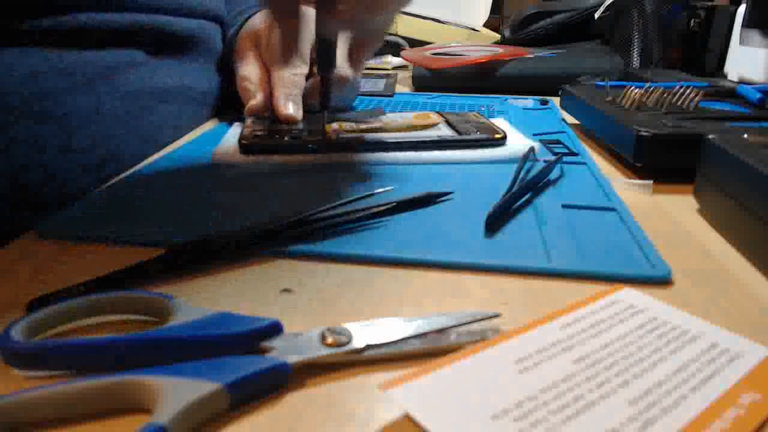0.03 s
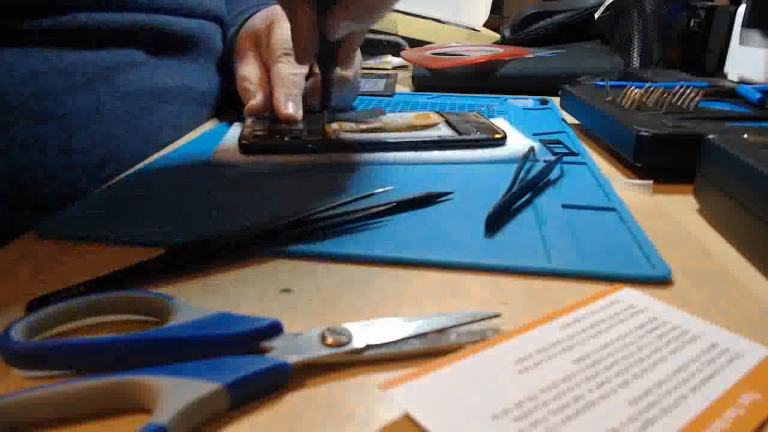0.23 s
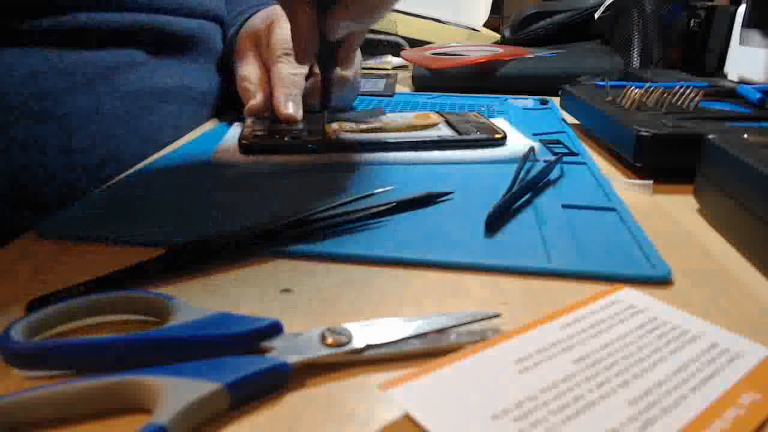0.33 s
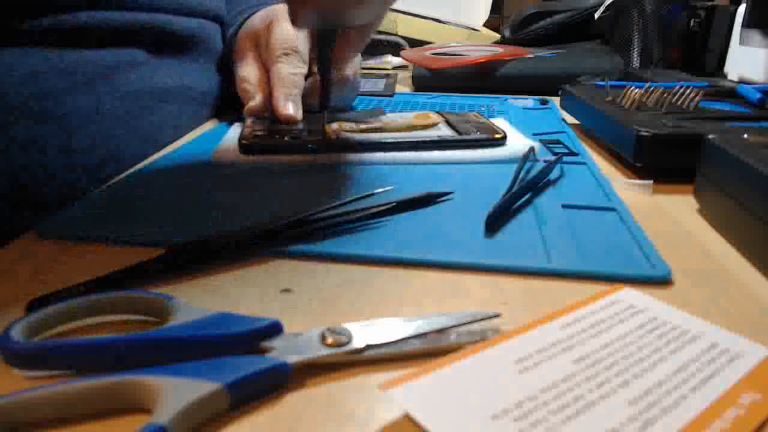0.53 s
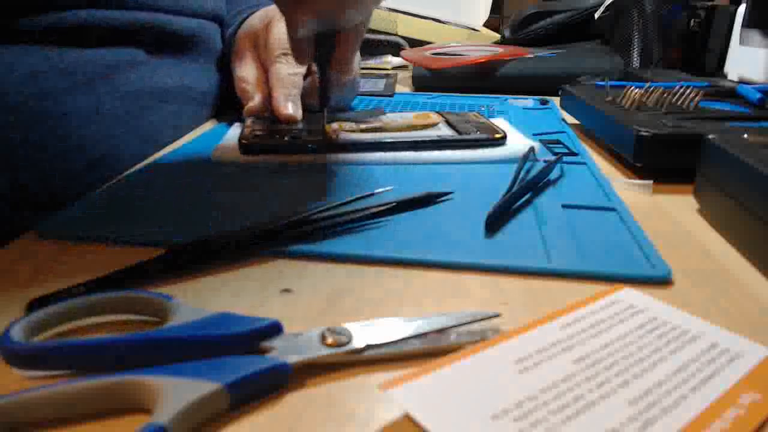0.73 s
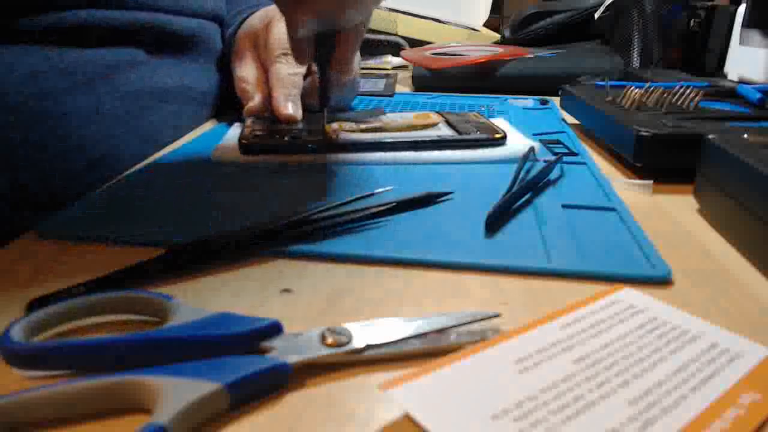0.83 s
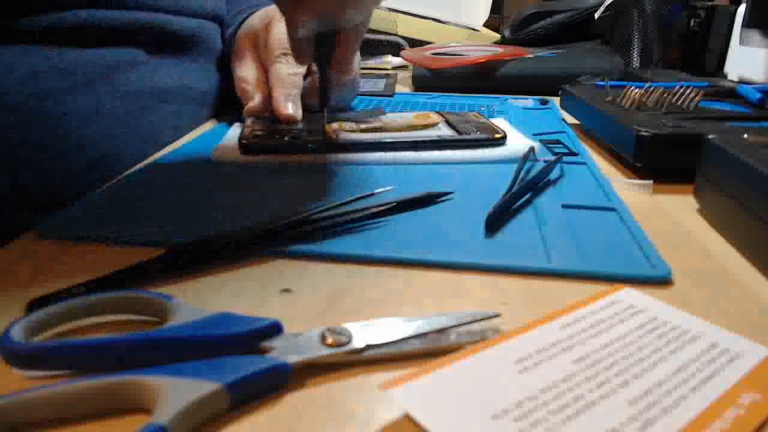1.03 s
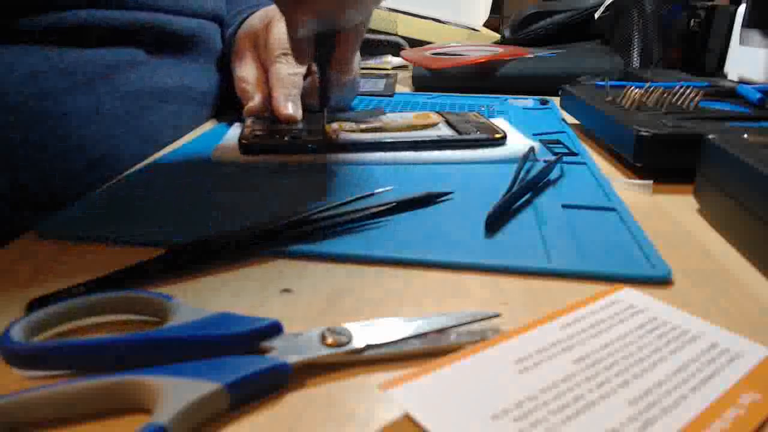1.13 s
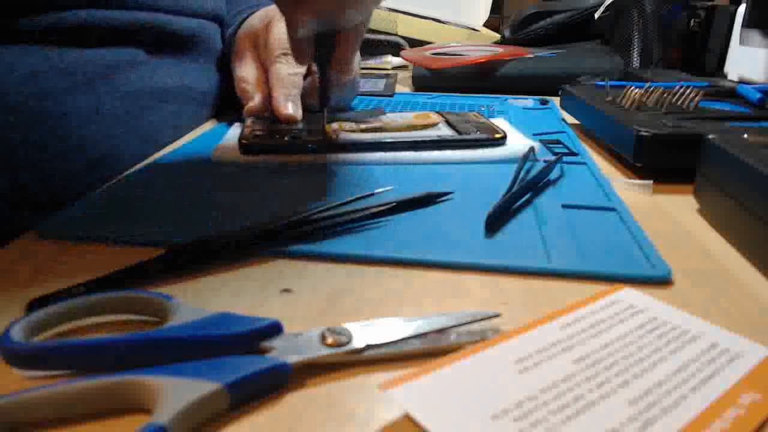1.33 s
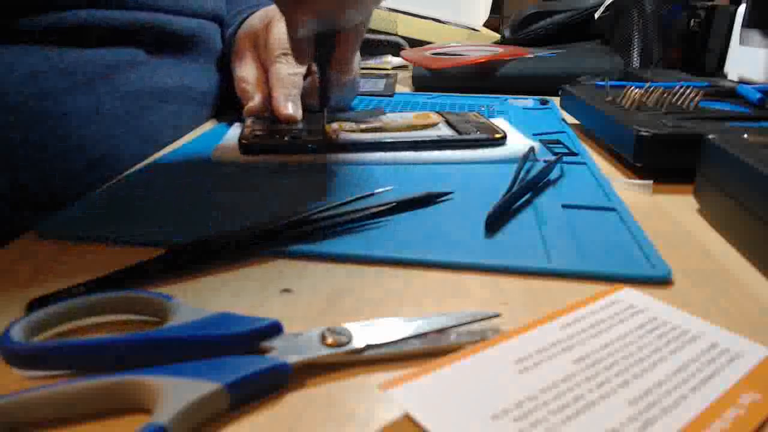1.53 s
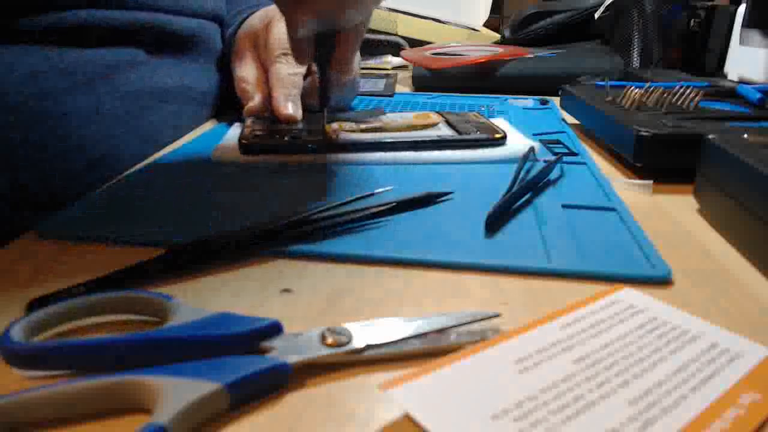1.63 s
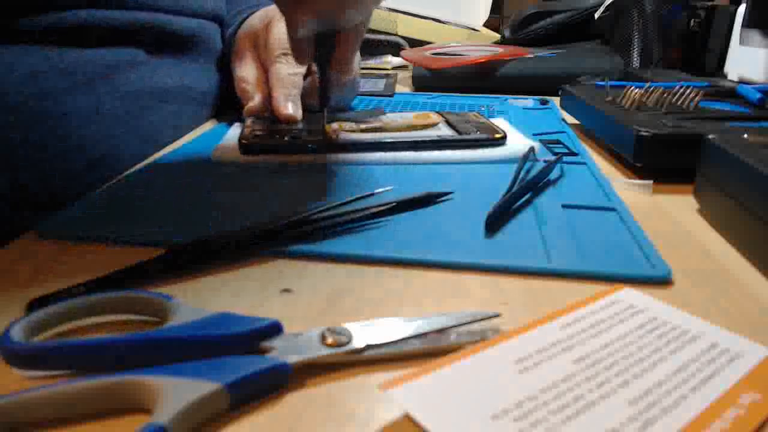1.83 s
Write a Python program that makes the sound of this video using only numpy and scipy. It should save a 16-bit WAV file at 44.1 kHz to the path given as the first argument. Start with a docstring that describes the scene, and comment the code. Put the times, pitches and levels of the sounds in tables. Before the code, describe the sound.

A small screwdriver ticks and knocks against a metal device frame on a desk mat. After a barely audible touch, a hard, woody-metallic clack lands at 0.25 s with a short scrape and small aftershocks. Faint ticks near 0.5, a click cluster at 0.65, a brighter ringing rattle at 0.82, then sparse light ticks at 1.1, 1.4 and 1.55. Close, small room, faint fan-like hum and hiss throughout.

```python
"""A small screwdriver works tiny screws in a metal frame on a work mat, close to a two-port microphone.
Steel ticks and knocks through frame and desk are sums of damped modes; hand pushes are single low swings.
Scrapes are dense filtered clicks. A small room answers the ticks, knocks and pushes by convolution.
Beneath lie mains harmonics, a fan-like drone of narrow noise bands, a thin whine and shaped hiss."""
import sys
import numpy as np
from scipy import signal
from scipy.fft import rfft, irfft
from scipy.io import wavfile
from scipy.ndimage import uniform_filter1d

SR = 44100
rng = np.random.default_rng(int(sys.argv[2]) if len(sys.argv) > 2 else 0)


def boost(x):
    """Linear amplitude factor 10**(x/20) for a level x in decibels (scalar or array-like)."""
    u = np.asarray(x, float) / 20
    return 10 ** u


def to_wav(sig):
    """Store sig (one row per channel, or 1-D mono) as 16-bit WAV at the path in sys.argv[1].

    Samples outside -1..1 are clipped; the rate is SR.
    """
    pcm = np.clip(np.atleast_2d(sig), -1, 1) * 32767
    pcm = np.round(pcm).astype(np.int16)
    wavfile.write(sys.argv[1], SR, pcm.T)  # frames by channels


N = 83790


def evened(x):
    """Normalization: scales a signal to rms 1."""
    return x / np.sqrt(np.mean(x ** 2) + 1e-20)


def read(points, hz):
    """Linear interpolation of a table on a logarithmic frequency axis."""
    f, value = np.transpose(points)
    return np.interp(np.log(hz + 1), np.log(f + 1), value)


def add(mix, s, sound):
    """Superposition: adds a sound to the mix from time s."""
    part = mix[..., round(s * SR):][..., :sound.shape[-1]]
    part += sound[..., :part.shape[-1]]


def sides(db):
    """Interaural-style level difference: left and right gains, db apart and centred on 0 dB."""
    return boost(np.array([[db / 2], [-db / 2]]))


def early(x, lead_s):
    """Arrival-time difference: a linear phase shift puts the left port ahead of the right."""
    hz = np.fft.rfftfreq(len(x), 1 / SR)
    advance = np.exp(2j * np.pi * hz * np.array([[lead_s], [0]]))
    return irfft(rfft(x) * advance, len(x))


def hum():
    """Harmonic series: steady sines of random phase at multiples of the mains frequency."""
    # Mains harmonics: multiple, rms level/dB midway between the ports
    harmonics = [(2, -75), (3, -65), (4, -68.5), (5, -88.5)]
    mains_hz = 49.07
    t = np.arange(N) / SR
    out = np.zeros(N)
    for k, db in harmonics:
        out += np.sqrt(2) * boost(db) * np.sin(2 * np.pi * (k * mains_hz * t + rng.random()))
    return out


def drone():
    """Narrow-band noise: low-passed complex noise modulates a carrier, so each band wavers."""
    # Fan-like bands: centre f/Hz, width of one filter stage/Hz, rms level/dB midway between the ports
    bands = [(44.5, 3.7, -70), (382, 14, -83), (420.4, 21, -66), (460, 19, -68), (538.3, 10, -73.5),
             (619.3, 19.6, -61), (654, 10.6, -63), (673, 3.5, -70), (713.5, 17, -64), (1121, 90, -75),
             (1534, 76, -85), (1665, 14, -84.5)]
    t = np.arange(N) / SR
    out = np.zeros(N)
    for hz, width, db in bands:
        pole = np.exp(-np.pi * width / SR)
        envelope = rng.standard_normal((N, 2)) @ [1, 1j]
        for _ in range(2):
            envelope = signal.lfilter([1 - pole], [1, -pole], envelope)
        out += boost(db) * evened((envelope * np.exp(2j * np.pi * hz * t)).real)
    return out


def whine():
    """Frequency modulation: a thin sine of steady level follows a slowly wandering pitch."""
    mean_hz, wander_rms_hz, rms_db = 3900, 22.5, -92.5
    hz = mean_hz + wander_rms_hz * evened(uniform_filter1d(rng.standard_normal(N), size=800))
    return np.sqrt(2) * boost(rms_db) * np.sin(2 * np.pi * np.cumsum(hz) / SR)


def hiss():
    """Partially coherent noise: random short-time spectra, mixed to a given likeness of the ports."""
    # Spectral shape of the hiss: f/Hz, relative density level/dB
    shape = [(15, -26), (25, -6), (157, -9.5), (324, -8.5), (422, -4), (537, -12), (621, -3), (810, -11),
             (1110, -16), (3540, -33), (3990, -33.5), (8040, -43.5), (10500, -78.5), (17700, -120)]
    # Coherence of the two ports: f/Hz, left-right likeness (0 to 1)
    likeness = [(60, 0.37), (200, 1), (670, 0.65), (2260, 0.13), (7590, 0.02)]
    rms_db, patch_rms_db, size = -58, 2.5, 2048
    frames, hz = N * 4 // size + 5, np.fft.rfftfreq(size, 1 / SR)
    a, b, c, d, patch = rng.standard_normal((frames, len(hz), 5)).T
    # Smoothing over frequency and time makes patches of raised and lowered level
    patch = uniform_filter1d(uniform_filter1d(patch, size=14, axis=0), size=8, axis=1)
    level_db = read(shape, hz)[:, None] + patch_rms_db * evened(patch)
    same = np.clip(read(likeness, hz), -1, 1)[:, None]
    left = a + 1j * b
    right = same * left + np.sqrt(1 - same ** 2) * (c + 1j * d)
    spectra = np.array([left, right]) * boost(level_db)
    sound = signal.istft(spectra, nperseg=size, noverlap=size * 3 // 4)[1][:, :N]
    return boost(rms_db) * evened(sound)


def background():
    """Superposition of the steady sounds, stronger at the left port."""
    return (hum() + drone() + whine() + hiss()) * sides(4.5)


def body_ports(x):
    """Port differences of knocks and pushes: the left is 4 dB stronger and 86 microseconds late."""
    return early(x, -0.000086) * sides(4)


def pushes():
    """Transient displacement: each hand push on the desk is a low swing that dies without ringing."""
    # Hand pushes: start t/s, approximate peak level/dB midway between the ports, swing period/s
    swings = [(.034, -44.5, 0.015), (.236, -31.5, 0.014), (.355, -54, 0.063), (.487, -41.5, 0.013),
              (0.627, -41, .016), (0.658, -42.5, 0.0089), (0.67, -41, 0.0062), (1.301, -56, 0.016),
              (1.415, -57, 0.022)]
    out = np.zeros(N)
    for s, db, period in swings:
        u = np.arange(0, 3 * period, 1 / SR) / period
        envelope = np.minimum(u / .2, 1) * np.exp(-(u / .9) ** 4)
        add(out, s, boost(db) * np.sin(2 * np.pi * u) * envelope)
    return body_ports(out)


def ring(modes, mid_hz, spread, chance, rise_s, spread_db=1.5, detune=.012):
    """Modal synthesis: damped sines, strongest near the pitch the blow favours, scaled to peak 1."""
    t = np.arange(round(.2 * SR)) / SR
    out = np.zeros(len(t))
    for (hz, db, t60), (a, b) in zip(modes, chance):
        favour_db = -4.34 * (np.log2(hz / mid_hz) / spread) ** 2
        decay = boost(db + favour_db + spread_db * a - 60 * t / t60)
        # All modes are in step two rise times after the start
        out += decay * np.sin(2 * np.pi * hz * (1 + detune * b) * (t - 2 * rise_s))
    out *= (1 - np.exp(-t / rise_s)) ** 2
    return out / abs(out).max()


def ticks():
    """Modal excitation: the tip's blows ring the steel for milliseconds; gives direct sound and room feed."""
    # Steel tip on screw or frame: t/s, peak level/dB midway between the ports, favoured f/Hz,
    # spread/octaves, room share/dB relative to the tick, lead of the left port/microseconds
    strikes = [(.0490, -61, 6560, 0.13, -8.5, 26), (0.2495, -29, 5880, 0.52, -36, 31),
               (.3867, -57.5, 6600, 0.38, -34.5, 20), (0.4918, -55.5, 4130, 0.43, -29, 23),
               (0.4965, -54.5, 4500, 1.3, -31, 27), (0.5191, -50.5, 6050, 0.8, -16.5, 3),
               (.6543, -44, 3000, 1.3, -18, 20), (.6578, -49, 2600, 1.1, -22, 20),
               (.6626, -48, 2400, .8, -22, 20), (.6571, -38, 7300, .4, -24, 20),
               (.6633, -39, 6900, .5, -24, 20), (0.6656, -46, 2320, 0.48, -28, 39),
               (.8122, -35, 3950, .12, -10, 70), (.8130, -36, 4300, .12, -10, 70),
               (.8160, -30, 4850, .13, -9, 50), (.8226, -36, 4500, .12, -9, 70),
               (0.814, -37, 7080, 0.11, -14, 54.5), (0.8179, -38.5, 2990, 0.16, -2, 49.5),
               (.8251, -40, 4500, .12, -13, 70), (1.0844, -42, 4700, .35, -19, -20),
               (1.2015, -57, 4130, 0.46, -12, -46), (1.3797, -45, 5600, .6, -18, -50),
               (1.3803, -49, 7350, .08, -18, -50), (1.3806, -46, 6100, .1, -10, -50),
               (1.4262, -57, 4600, .2, -7, -18), (1.443, -60, 6460, .7, -14, 12),
               (1.5555, -53.5, 6600, 0.18, -38, -25), (1.5570, -59, 4500, .12, -6, -22),
               (1.5587, -57, 4170, 0.068, -18, -29), (1.559, -55.5, 6500, .3, -25, -25)]
    # Modes of the steel, before chance variation: f/Hz, relative level/dB, t60/s
    steel_modes = [(1200, -1.5, .005), (1700, -1, 0.0045), (2460, -3.5, .004), (3000, -6.5, 0.0024),
                   (3770, 6, 0.0051), (4306, -4.5, 0.011), (4760, -2, 0.0093), (5020, -4.5, 0.0091),
                   (5700, -5, 0.012), (6250, 0.5, 0.011), (7060, -2.5, 0.015), (7520, 4.5, 0.0074)]
    out, feed = np.zeros((2, N)), np.zeros((2, N))
    chance = rng.standard_normal((len(strikes), len(steel_modes), 2))
    for (s, db, hz, spread, room_db, lead_us), c in zip(strikes, chance):
        # One millisecond of silence in front leaves space for the left port's lead
        padded = np.roll(ring(steel_modes, hz, spread, c, rise_s=2.2e-4), SR // 1000)
        tick = boost(db) * early(padded, lead_us * 1e-6)[:, :SR // 20]
        add(out, s - .001, tick)
        add(feed, s - .001, boost(room_db) * tick)
    return out * sides(3), feed * sides(3)


def room(x):
    """Reverberation by convolution: sparse taps of random sign, each band decaying at its own rate."""
    # Reverberation time of the small room: f/Hz, t60/s
    decay_times = [(100, 0.59), (500, 0.42), (1500, 0.37), (4500, 0.19), (8000, 0.49)]
    same = 0.68  # likeness of the left and right taps
    taps = np.zeros((2, SR // 2))
    # One tap at a random place in every 20 samples
    at = np.arange(100, SR // 2 - 20, 20) + rng.integers(0, 20, (2, (SR // 2 - 101) // 20))
    np.put_along_axis(taps, at, rng.choice([-1., 1.], at.shape), 1)
    taps[1] = same * taps[0] + np.sqrt(1 - same ** 2) * taps[1]
    hz, t, z = signal.stft(taps, SR, nperseg=256)
    decay = boost(-60 * t / read(decay_times, hz)[:, None])
    tail = signal.istft(z * decay, SR, nperseg=256)[1]
    return signal.fftconvolve(x, tail / np.linalg.norm(tail[0]), axes=1)[:, :N]


def scrapes():
    """Granular friction noise: dense tiny clicks swell and die away, each stroke around its own pitch."""
    # Scrapes and rattles: start t/s, rise/s, t60 of the fall/s, top rms level/dB midway between the ports,
    # favoured f/Hz, spread/octaves
    strokes = [(.081, 0.044, 0.77, -78, 5900, 1.1), (.234, 0.0018, 0.36, -60.5, 4000, 2.3),
               (0.2495, .006, 0.072, -51, 5000, 3), (.354, 0.014, 0.1, -72.5, 5000, 1.8),
               (0.625, 0.0056, 0.48, -69, 5580, 1.7), (.653, .002, 0.059, -52, 2490, 1.3),
               (.8105, .0015, 0.41, -60.5, 4600, 0.42), (1.38, 0.0018, 0.22, -75.5, 6250, .035)]
    # Spectral shape common to all strokes: f/Hz, relative level/dB
    shape = [(880, -49), (1500, -11.5), (3600, -19.5), (4030, -18), (5880, -14.5), (8000, -24),
             (10400, -66), (17600, -120)]
    grains_per_s, grain_spread_db = 4900, 4.5
    skirt_db = -10  # broad rustle around each stroke's pitch
    present = rng.random((N, 2)) < grains_per_s / SR
    size = boost(grain_spread_db * np.minimum(rng.exponential(1, (N, 2)), 3))
    grains = (present * size * rng.choice([-1, 1], (N, 2))).T
    hz, t = np.fft.rfftfreq(N, 1 / SR), np.arange(SR // 2) / SR
    # Each port also takes a third of the other's grains
    grit = rfft(grains + 0.33 * grains[::-1]) * boost(read(shape, hz))
    out = np.zeros((2, N))
    for s, rise, t60, db, mid_hz, spread in strokes:
        envelope = np.zeros(N)
        add(envelope, s, np.minimum(t / rise, 1) * boost(db - 60 * np.maximum(t - rise, 0) / t60))
        peak = np.exp(-.5 * (np.log2((hz + 1) / mid_hz) / spread) ** 2)
        out += envelope * evened(irfft(grit * (peak + boost(skirt_db)), N))
    return out * sides(3.5)


def knocks():
    """Structure-borne sound: each knock on the mat excites the damped modes of frame and desk."""
    # Frame knocked on the mat: t/s, peak level/dB midway between the ports, favoured f/Hz, spread/octaves
    blows = [(0.2489, -15, 798, 1.8), (0.2535, -35, 290, 1.5), (0.262, -33.5, 620, 0.31),
             (.2990, -42, 890, 0.26), (.2890, -50, 250, .15), (.3040, -48, 250, .15), (.6555, -48, 450, 1),
             (.8217, -37, 1000, .13), (.8248, -31.5, 1000, .13), (.9128, -47, 790, 0.51)]
    # Modes of frame and desk: f/Hz, relative level/dB, t60/s
    frame_modes = [(50, -11, 0.23), (135.6, -1, 0.085), (250, -14, .07), (455, 0, .026), (715, 1, .016),
                   (866, 4, .012), (985, -1, .014), (1146, -20.5, 0.0069), (1510, 4, 0.0064),
                   (2020, -9.5, 0.0096), (2650, -20, 0.011)]
    out, no_chance = np.zeros(N), np.zeros((len(frame_modes), 2))
    for s, db, hz, spread in blows:
        add(out, s, boost(db) * ring(frame_modes, hz, spread, no_chance, rise_s=0.0006))
    return body_ports(out)


def scene():
    """Superposition of the work sounds, their room and the background."""
    steel, feed = ticks()
    body = knocks() + pushes()
    body_room_db = -9.5  # room share of knocks and pushes
    return steel + scrapes() + body + room(feed + boost(body_room_db) * body) + background()


def roll_off(x):
    """The treble ends steeply here."""
    return signal.sosfilt(signal.butter(12, 8190, fs=SR, output="sos"), x)


def record(dry):
    """Low-pass filtering: the recorder's band limit falls by 50 dB across a narrow edge."""
    edge_hz, edge_width_hz = 7650, 900
    hz = np.fft.rfftfreq(N, 1 / SR)
    fall_db = -50 * np.clip((hz - edge_hz) / edge_width_hz, 0, 1)
    mix = irfft(rfft(dry) * boost(fall_db), N)
    return roll_off(mix)


dry = scene()
out = record(dry)
to_wav(out)
```